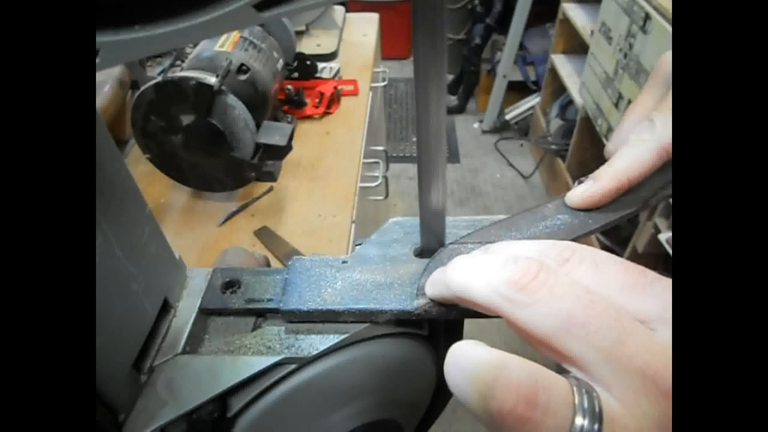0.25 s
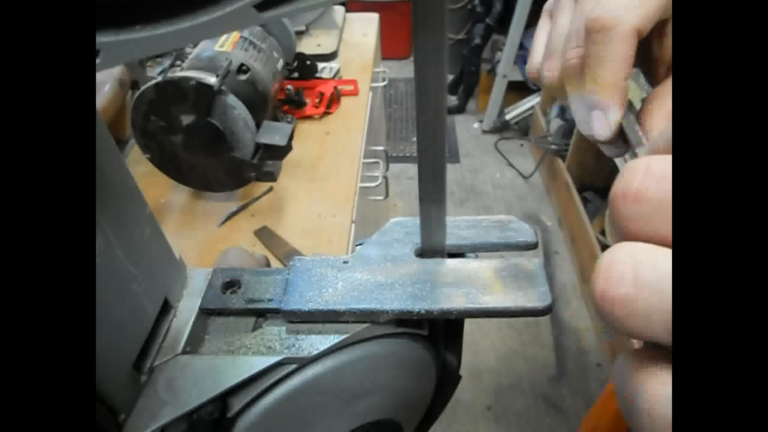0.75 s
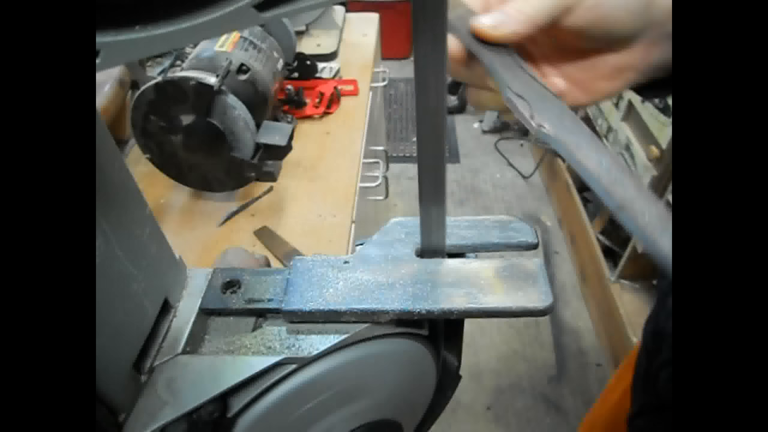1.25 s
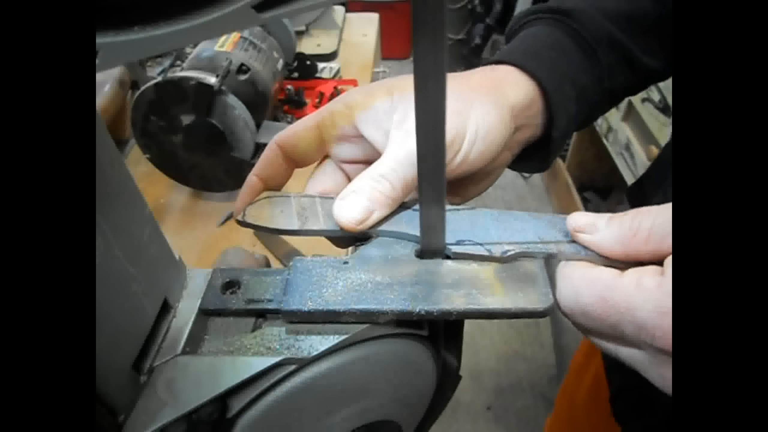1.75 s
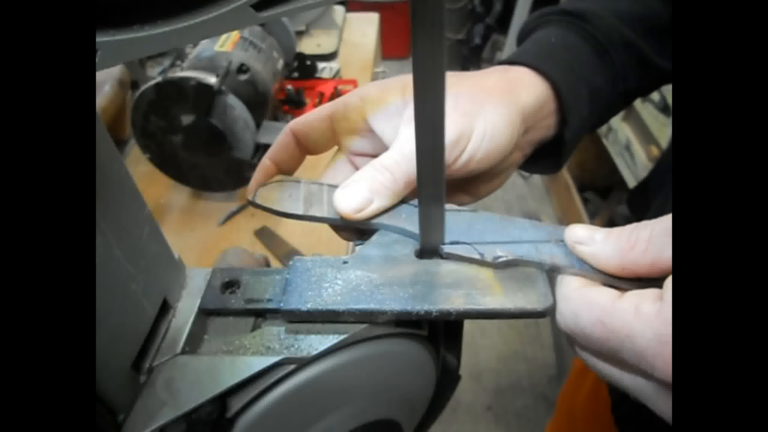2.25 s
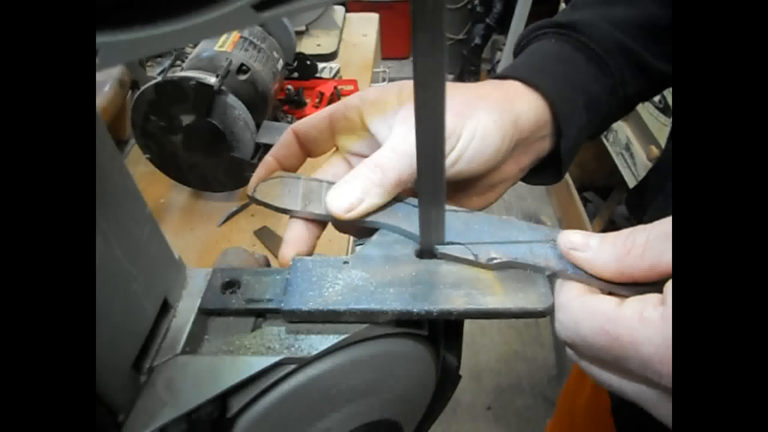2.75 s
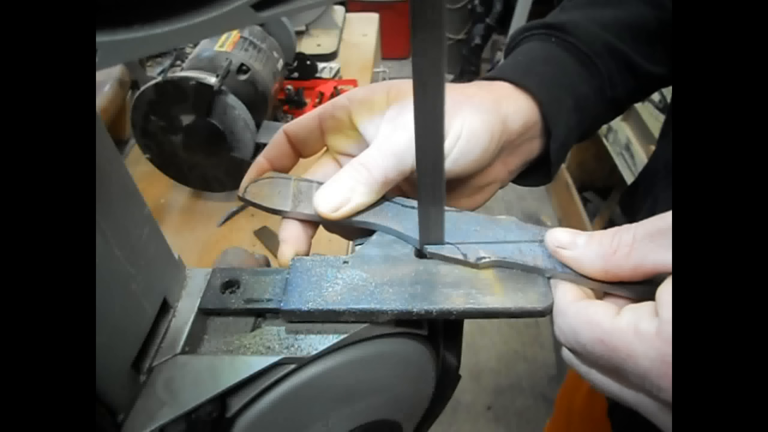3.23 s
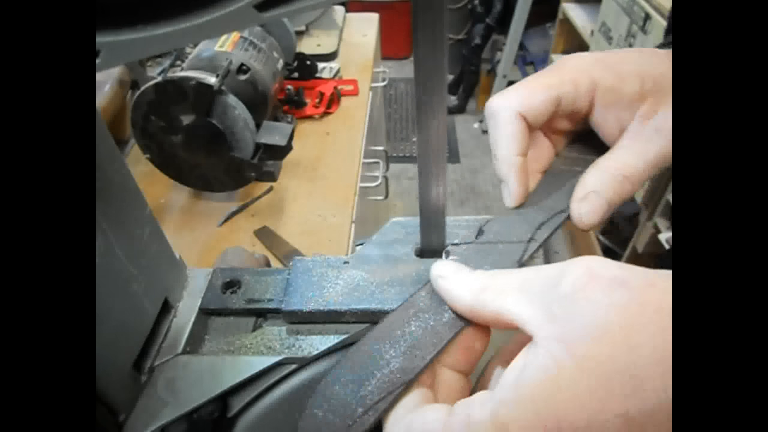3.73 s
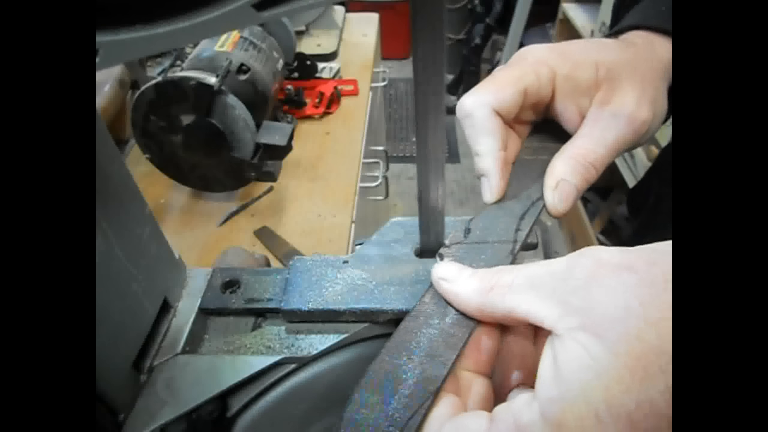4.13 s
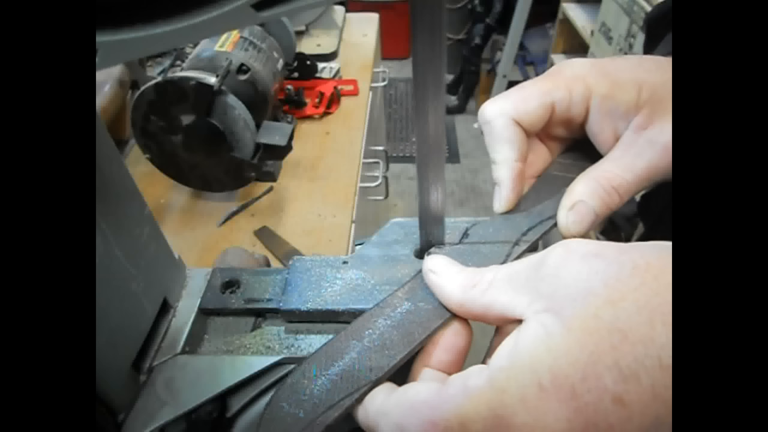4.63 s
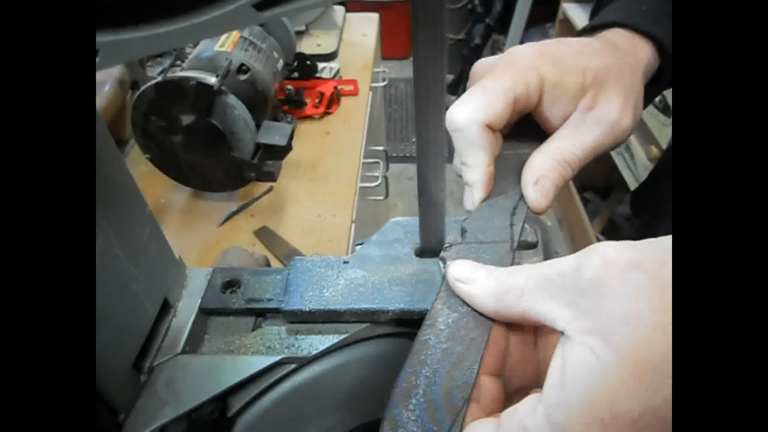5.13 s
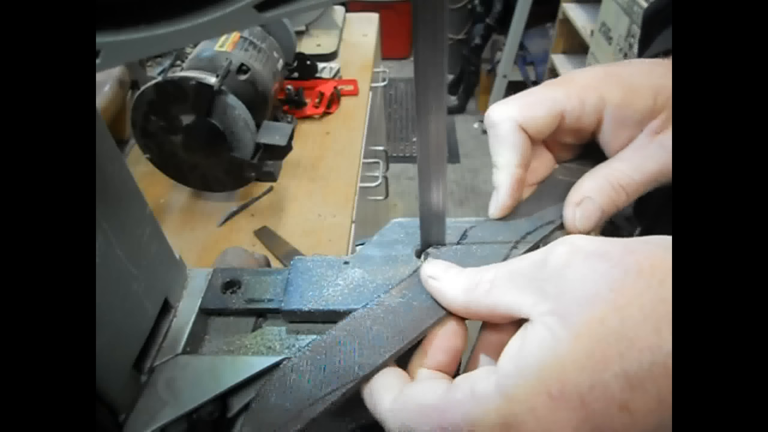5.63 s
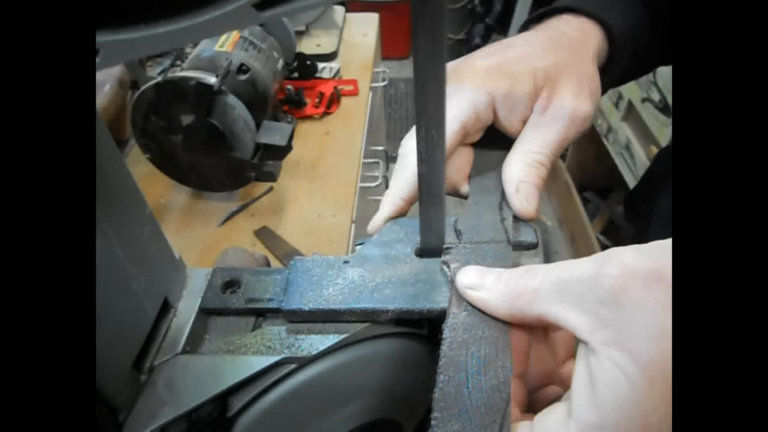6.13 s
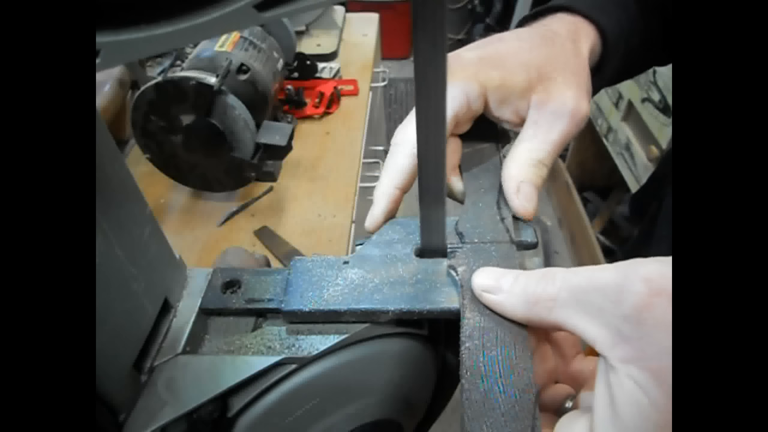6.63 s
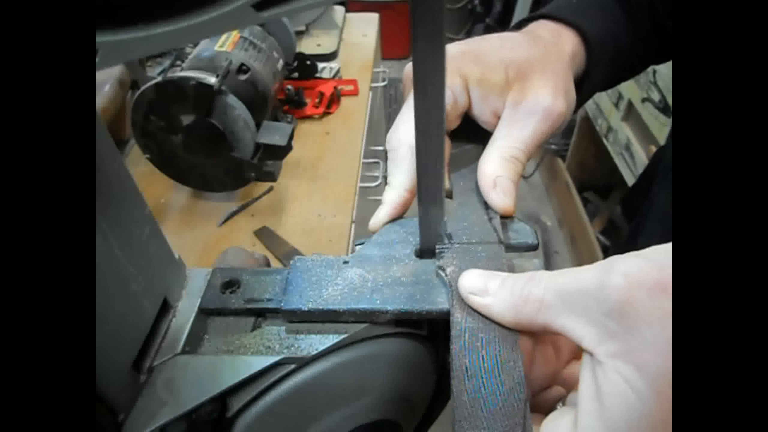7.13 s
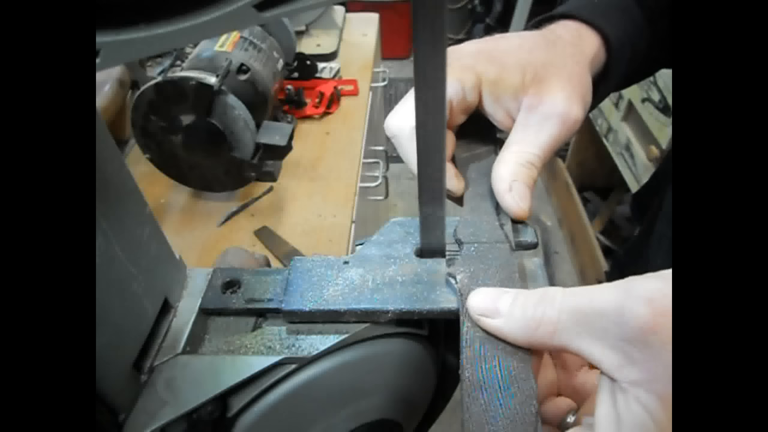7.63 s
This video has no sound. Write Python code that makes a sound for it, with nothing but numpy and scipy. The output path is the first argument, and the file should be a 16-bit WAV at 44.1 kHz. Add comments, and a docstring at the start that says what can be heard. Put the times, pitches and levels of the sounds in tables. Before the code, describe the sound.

A small bandsaw runs with a steady roar and ringing rasp, its blade humming as steel is pushed in, with a few brief dips.

```python
"""A small bandsaw cutting steel

The motor shakes the frame into a roar, and the blade rasps and rings as it slides through its guides.
A thin, wavering whine rides on top. Each time a piece of steel is pushed in by hand, the teeth
hum and the piece rumbles on the table. The level dips briefly a few times."""
import sys
import numpy as np
from scipy import signal
from scipy.fft import rfft, irfft
from scipy.io import wavfile
from scipy.ndimage import uniform_filter1d

SR = 44100
rng = np.random.default_rng(int(sys.argv[2]) if len(sys.argv) > 2 else 0)


def bounce(signal):
    """Save signal as a 16-bit WAV file at the path given by the first command-line argument."""
    frames = np.transpose(np.atleast_2d(signal))
    limited = np.clip(frames, -1, 1)
    pcm = np.round(limited * 32767).astype(np.int16)
    wavfile.write(sys.argv[1], SR, pcm)


N = 347508
TIME = np.arange(N) / SR
FREQS_HZ = np.fft.rfftfreq(N, 1 / SR)

# Slow rise and fall of the running saw: time_s, change_db
SWELL = [(0, -0.2), (.5, -1), (.66, 1.1), (1.12, -.4), (1.5, 1), (1.72, -.3), (2.25, -.3), (2.42, .3),
         (2.85, -0.7), (3.55, 0.1), (4.1, 0.8), (4.32, -0.3), (4.7, 0.4), (5.55, 0.2), (6.08, -0.4),
         (6.26, -1.5), (6.95, -0.4), (7.88, 0.3)]
# Tone colour of the frame's roar: pitch_hz, relative_db
ROAR_COLOUR = [(20, -31), (45, -15.5), (110, -23.5), (350, -18.5), (480, -15), (560, -8.5), (620, -3.5),
               (685, 1.5), (750, -1.5), (950, 0.5), (1110, -1.5), (1270, 0), (1480, -7), (2300, -17.5),
               (3500, -18)]
# Notes at which the motor, wheels and frame ring: pitch_hz, width_hz, level_db
FRAME_RINGS = [(65, 14, -54), (781, 22, -38.5), (1038, 20, -39.5), (1206, 40, -43), (1555, 22, -48)]
# Loudness of the whine: time_s, level_db
WHINE_LEVEL = [(0, -19.5), (.7, -21.5), (1.05, -20), (1.65, -20), (2.3, -23), (2.65, -20.5), (3.3, -23),
               (3.65, -19.3), (4.3, -23), (4.72, -21), (5.03, -22.5), (5.18, -28), (5.48, -27),
               (5.57, -20.5), (6.1, -20.5), (6.5, -22), (6.75, -21), (7.88, -22)]
# The whine slips, fading and bending up: time_s, half_length_s, fade_db, bend_hz
WHINE_SLIPS = [(.19, .04, 2, 45), (.4, .025, 3.5, 45), (1.15, .04, 6, 45), (1.46, .025, 3, 55),
               (2.46, .045, 1.5, 75), (3.44, .028, 11, 180), (3.94, .025, 1.5, 95), (4.47, .02, 7, 120),
               (4.93, .038, 10, 150), (5.5, .018, 7, 120), (5.69, .03, 5.5, 95), (6.27, .03, 3.5, 35),
               (6.43, .03, 3, 60), (6.57, .03, 9, 170), (7.24, .02, 3, 70), (7.45, .022, 8, 160),
               (7.71, .025, 4, 55)]
# The whine catches and its pitch sags: time_s, half_length_s, sag_hz
WHINE_CATCHES = [(1.52, .03, 75), (2.66, .13, 45), (3.54, .04, 50), (3.89, .02, 70), (4.03, .04, 75),
                 (4.56, .05, 95), (5.11, .08, 70), (5.63, .035, 125), (6.12, .04, 95), (6.81, .08, 85)]
# The steel is pushed into the blade: start_s, length_s, pressure (1 is firm), rumble_db
PUSHES = [(1.4, 0.65, 0.53, -41), (1.806, 0.615, 0.82, -35), (2.57, 0.786, 1, -38),
          (4.154, 0.26, 0.66, -39.5), (4.485, 0.32, 1.4, -46), (5.07, 0.31, .55, -36),
          (5.497, 0.17, 0.69, -49), (5.973, 0.51, 1.14, -42), (6.68, 0.64, 0.94, -40)]
# Tone colour of the piece's rumble: pitch_hz, relative_db
RUMBLE_COLOUR = [(40, -13), (110, -2), (200, -4.5), (270, 8.5), (340, 4), (450, 0.5), (560, -14)]
# Boom of the piece held flat, on top of its rumble: pitch_hz, width_hz, relative_db
FLAT_BOOM = [(208, 26, -10.5), (275, 58, -9.5)]
# Its boom once it is turned: pitch_hz, width_hz, relative_db
TURNED_BOOM = [(143.7, 10, -13), (209, 35, -8.5)]
# Teeth ringing in the cut under a firm push: pitch_hz, width_hz, level_db
BITE_RINGS = [(4140, 35, -37.5), (4300, 560, -31), (4387, 22, -36.5), (5500, 700, -33)]
# Clearer notes the blade adds once the piece is turned: pitch_hz, width_hz, level_db
TURNED_BITE_RINGS = [(3101, 14, -37.5), (4386, 14, -39)]
# Tone colour of the blade's rasp: pitch_hz, relative_db
RASP_COLOUR = [(1200, -27.5), (1900, -15.5), (2250, -14), (2650, -8), (3000, -3), (3550, -2), (4000, -5.5),
               (4550, -4), (4900, -1.5), (5600, -3), (6800, -7.5), (8450, -10.5), (9600, -9), (10450, -15),
               (10700, -18.5)]
# Notes at which the blade rings: pitch_hz, width_hz, level_db
BLADE_RINGS = [(3103, 22, -39), (3357, 22, -41), (3615, 60, -39), (4890, 170, -35.5), (5700, 60, -43),
               (6210, 50, -42), (6715, 25, -48), (7260, 70, -48), (8050, 130, -44), (8930, 250, -43),
               (9320, 90, -43)]
# The blade chafes in the slot: time_s, half_length_s, level_db
CHAFES = [(0.705, .02, -21), (1.245, .025, -25), (2.035, 0.014, -22), (6.065, 0.049, -22),
          (6.85, 0.38, -25.5)]
# The note that flares up when it chafes: pitch_hz, width_hz, relative_db
CHAFE_RING = [(4940, 260, 0)]
# How much left and right differ at each pitch: pitch_hz, gain_db
WIDTH_COLOUR = [(400, -63), (620, -29.5), (1100, -13.5), (1900, -33.5), (2700, -82), (3200, -74),
                (3900, -16), (4800, -17.5), (6200, -57), (10000, -66.5)]
# Brief dips in the whole sound: start_s, depth_db, hold_s, recovery_s
DIPS = [(.722, 2, 0.3, .06), (2.406, 2, 0.074, .06), (4.93, 9, 0.056, .13), (5.308, 1.5, 0.14, .1),
        (6.122, 1.5, 0.014, 0.028), (7.68, 1.2, 0.1, 0.066)]

RASP_DB, ROAR_DB, IDLE_RUMBLE_DB = -18.5, -22.5, -40.5
GEAR_HZ, GEAR_WAVER_HZ, GEAR_DB = 781, 2.5, -39
WHINE_HZ, WHINE_WANDER_HZ = 10094, 19
TOOTH_HZ, HUM_DB = 574, -37.5
LEAN_IN_S, LET_GO_S, TURN_PIECE_S = 0.15, 0.095, 3.7
DRIVE_HZ, DRIVE_START_S, THROB_DB, UNEVEN_DB = 16.688, .043, .55, .25
WHEEL_HZ, FIRST_SLACK_S, SLACK_HALF_S = 7.281, .091, .014


def gain_of(db):
    """Turns decibels into a number to multiply a sound by."""
    return 10 ** (np.asarray(db) / 20)


def evened(x):
    """Scales a signal to an average strength (rms) of 1."""
    return x / np.sqrt(np.mean(x ** 2) + 1e-20)


def curve(points):
    """Joins (time, value) points with straight lines."""
    return np.interp(TIME, *np.transpose(points))


def bump(time_s, half_s):
    """A smooth bell of height 1 around a moment."""
    return np.exp(-((TIME - time_s) / half_s) ** 2)


def noise():
    """Plain, even hiss."""
    return rng.standard_normal(N)


def colour(x, points):
    """Makes each pitch louder or softer, following a tone colour table."""
    hz, db = np.transpose(points)
    shape_db = np.interp(np.log(FREQS_HZ + 1), np.log(hz + 1), db)
    return irfft(rfft(x) * gain_of(shape_db), N)


def drift(rate_hz):
    """A random wobble of strength 1, up to about the given speed."""
    return evened(irfft(rfft(noise()) / (1 + (FREQS_HZ / rate_hz) ** 4), N))


def ringing(notes):
    """Steady random rubbing keeps each note of the metal ringing at its own level."""
    power = np.zeros(len(FREQS_HZ))
    for hz, width_hz, db in notes:
        peak = 1 / (1 + ((FREQS_HZ - hz) / (.7 * width_hz)) ** 2) ** 2
        power += gain_of(db) ** 2 * peak / peak.mean()
    return irfft(rfft(noise()) * np.sqrt(power), N)


def reflections(sound):
    """The sound bounces around the workshop and quickly fades."""
    lag_s = np.arange(SR // 25) / SR
    bounces = rng.standard_normal(len(lag_s)) * (lag_s > .008) * np.exp(-lag_s / .02)
    return signal.fftconvolve(sound, bounces / np.linalg.norm(bounces))[:N]


def level_dips():
    """A change in decibels: each dip falls at once, holds, and comes back."""
    return sum(curve([(s - .001, 0), (s + .001, -db), (s + hold_s, -db), (s + hold_s + back_s, 0)])
               for s, db, hold_s, back_s in DIPS)


def frame(roar_db):
    """Motor and gears shake the housing: a broad roar with a few tones."""
    roar = evened(colour(noise(), ROAR_COLOUR)) * gain_of(.5 * drift(60))
    gear_turns = np.cumsum(GEAR_HZ + GEAR_WAVER_HZ * drift(8)) / SR
    gear = gain_of(GEAR_DB) * evened(np.sin(2 * np.pi * gear_turns))
    tones = gain_of(roar_db - np.median(roar_db)) * (ringing(FRAME_RINGS) + gear)
    return gain_of(roar_db) * roar + tones


def whine(throb, wobble_hz=12, jitter_hz=23, throb_db=.3, flutter_db=.8, fuzz_db=-12.5):
    """A thin, fuzzy tone that wobbles with the drive, sags under load and now and then slips."""
    sag_hz = sum(depth_hz * bump(s, half_s) for s, half_s, depth_hz in WHINE_CATCHES)
    pitch_hz = WHINE_HZ + WHINE_WANDER_HZ * drift(9.87) - sag_hz
    level_db = curve(WHINE_LEVEL) - 0.0014 * sag_hz
    for s, half_s, fade_db, bend_hz in WHINE_SLIPS:
        slip = bump(s, half_s)
        pitch_hz += bend_hz * slip
        level_db -= fade_db * slip
    snags = drift(41.6)
    turns = np.cumsum(pitch_hz - wobble_hz * throb - jitter_hz * snags) / SR
    fuzz = drift(330) + 1j * drift(330)  # a narrow band of hiss around the tone
    tone = np.exp(2j * np.pi * turns) * (1 + gain_of(fuzz_db) * fuzz)
    return gain_of(level_db + throb_db * throb + flutter_db * snags) * evened(tone.real)


def hand_feed():
    """Each push leans in, holds and lets go; gives the pressure and the strength of the rumble."""
    pressure, rumble_gain = np.zeros(N), np.zeros(N)
    for start_s, length_s, firmness, rumble_db in PUSHES:
        lean_in = np.clip((TIME - start_s) / LEAN_IN_S, 0, 1)
        push = lean_in * np.clip(1 - (TIME - start_s - length_s) / LET_GO_S, 0, 1)
        pressure = np.maximum(pressure, firmness * push)
        rumble_gain = np.maximum(rumble_gain, gain_of(rumble_db) * push)
    return pressure, np.hypot(rumble_gain, gain_of(IDLE_RUMBLE_DB))


def cut():
    """Under pressure the teeth hum and ring in the steel, and the piece booms on the table."""
    pressure, rumble_gain = hand_feed()
    turned = np.clip((TIME - TURN_PIECE_S) / .2, 0, 1)  # 0 held flat, 1 once turned
    teeth_passed = np.cumsum(TOOTH_HZ + 6 * drift(11.5)) / SR
    dug_in = np.clip((pressure - .3) / 0.42, 0, 1)  # a light touch makes no hum
    hum = gain_of(HUM_DB) * dug_in * evened(np.sin(2 * np.pi * teeth_passed))
    bite = pressure * ringing(BITE_RINGS) + turned * np.sqrt(pressure) * ringing(TURNED_BITE_RINGS)
    boom = (1 - turned) * ringing(FLAT_BOOM) + turned * ringing(TURNED_BOOM)
    rumble = gain_of(-4) * evened(colour(noise(), RUMBLE_COLOUR))
    return hum + bite + rumble_gain * (rumble + np.sqrt(np.minimum(pressure, 1)) * boom)


def scraping(snaps_per_s=1500, size_db=3.0, snap_share=0.15):
    """Smooth rubbing hiss plus tiny snaps of teeth and chips, a few of them larger."""
    sizes = gain_of(size_db * np.minimum(rng.exponential(1, N), 3))
    snaps = (rng.random(N) < snaps_per_s / SR) * np.sign(noise()) * sizes
    return np.sqrt(1 - snap_share) * noise() + np.sqrt(snap_share) * evened(snaps)


def shimmer(rasp, depth_db=0.92, rate_hz=67, bands=7):
    """The blade wanders in its guides, so each band of pitches swells and fades on its own."""
    spectrum, centres_hz = rfft(rasp), np.linspace(2500, 9500, bands)
    parts = (irfft(spectrum * np.interp(FREQS_HZ, centres_hz, row), N) for row in np.eye(bands))
    return sum(part * gain_of(depth_db * drift(rate_hz)) for part in parts)


def blade_slack():
    """The blade goes slack once per turn of its wheel: a row of bumps that averages zero."""
    slack = sum(bump(s, SLACK_HALF_S) for s in np.arange(FIRST_SLACK_S, N / SR, 1 / WHEEL_HZ))
    return slack - slack.mean()


def blade(rasp_db):
    """The blade rasps and rings as it slides through its guides, and now and then chafes."""
    rasp = shimmer(evened(colour(scraping(), RASP_COLOUR)))
    rings = gain_of(rasp_db - np.median(rasp_db)) * ringing(BLADE_RINGS)
    chafe = sum(gain_of(db) * bump(s, half_s) for s, half_s, db in CHAFES)
    return gain_of(rasp_db) * rasp + rings + chafe * ringing(CHAFE_RING)


def scene():
    """The saw sits straight ahead; left and right differ a little, more at some pitches than others."""
    drive_angle = 2 * np.pi * DRIVE_HZ * (TIME - DRIVE_START_S)
    throb = np.sin(drive_angle) - 0.22 * np.sin(2 * drive_angle)  # the load builds and eases each turn
    swell_db, slack = curve(SWELL), blade_slack()
    sway = drift(5.3)  # the whole machine runs a little unevenly
    rasp_db = RASP_DB + swell_db - slack + 0.16 * sway
    roar_db = ROAR_DB + 0.82 * swell_db - .6 * slack + 0.33 * sway
    saw = blade(rasp_db) * gain_of(THROB_DB * throb + UNEVEN_DB * drift(30))
    saw += frame(roar_db) + cut()
    saw *= gain_of(0.78 * np.sin(2 * np.pi * 187.5 * TIME))  # a faint buzz
    saw += whine(throb)
    width = colour(reflections(saw), WIDTH_COLOUR)
    return np.array([saw + width, saw - width]) * gain_of(level_dips())


def record(dry, threshold_db=-3, recovery_db_per_s=17.1, strength=0.45, top_hz=10750):
    """The volume steps down at loud peaks and creeps back; then the highest treble is cut off."""
    peak_db = 20 * np.log10(abs(dry).max(0) + 1e-9)
    wanted_db = strength * (peak_db - threshold_db)  # take off only part of the excess
    creep_db = TIME * recovery_db_per_s
    down_db = np.maximum(np.maximum.accumulate(wanted_db + creep_db) - creep_db, 0)
    softened = dry / gain_of(uniform_filter1d(down_db, size=40))
    treble_cut = signal.firwin(301, top_hz, window=("kaiser", 9), fs=SR)
    return signal.oaconvolve(softened, treble_cut[None], "same")


dry = scene()
out = record(dry)
bounce(out)
```